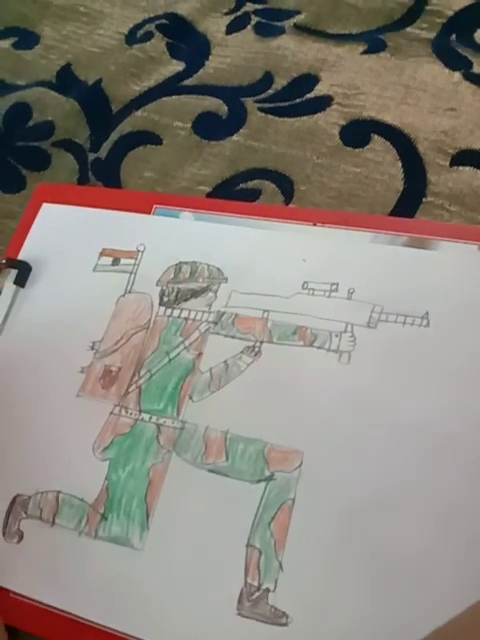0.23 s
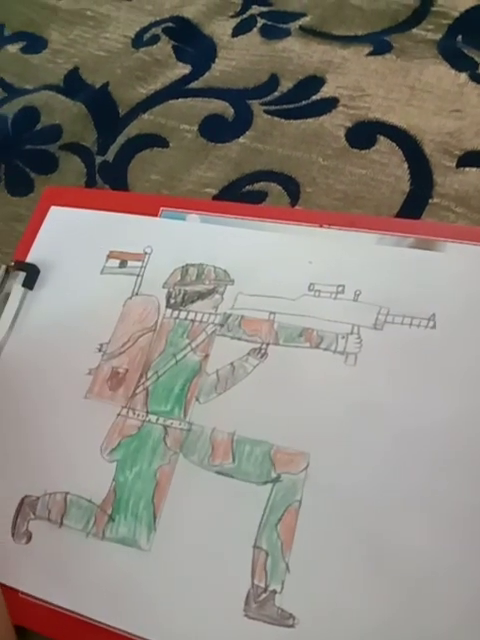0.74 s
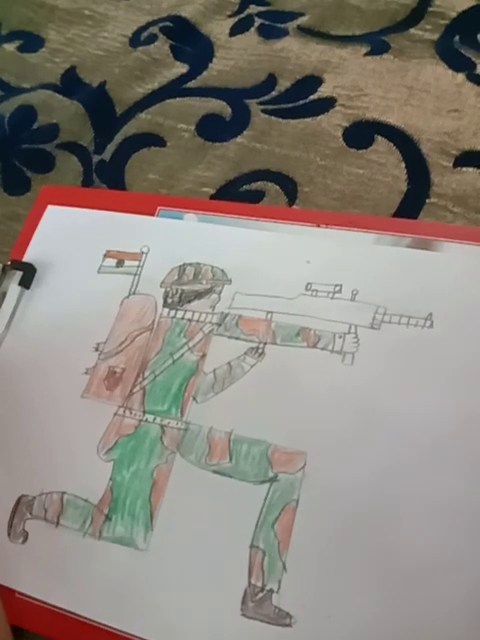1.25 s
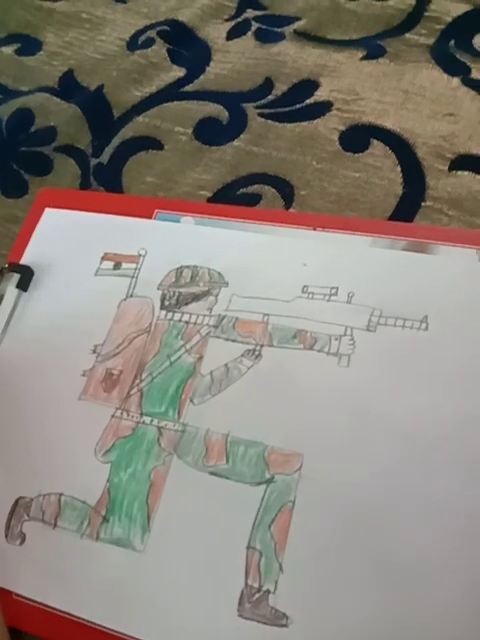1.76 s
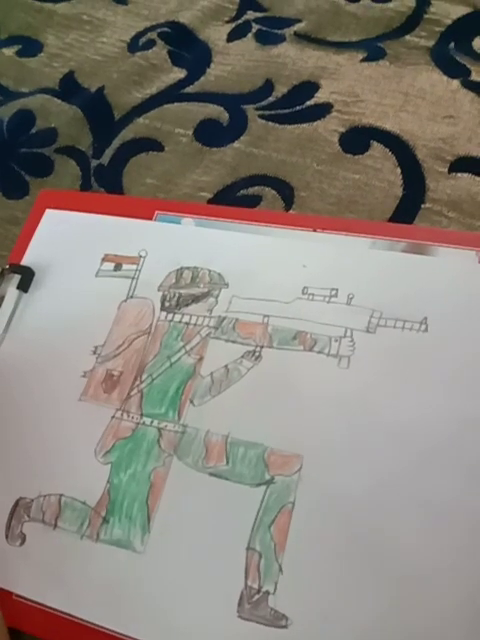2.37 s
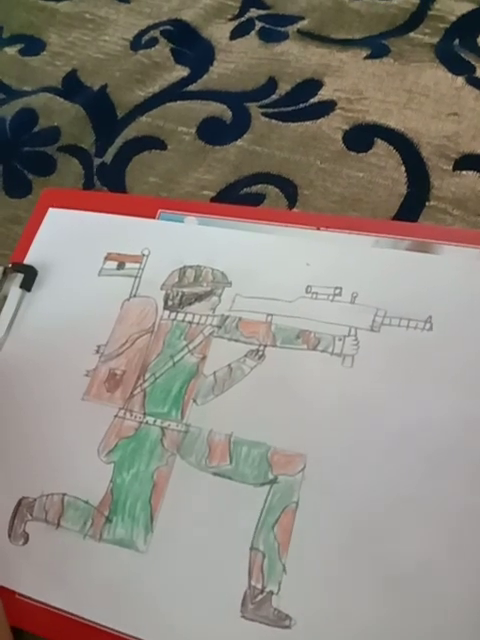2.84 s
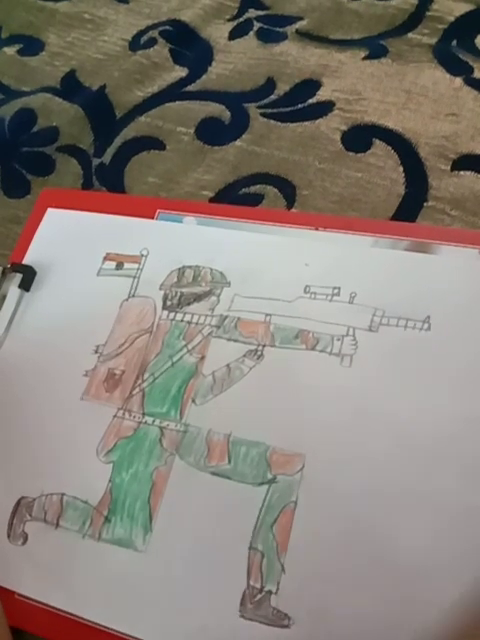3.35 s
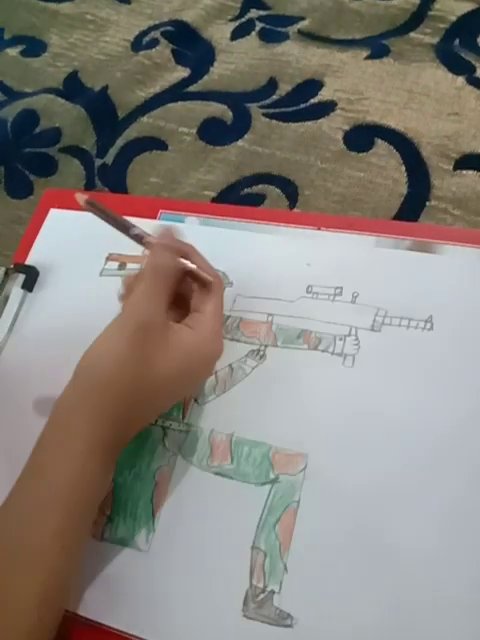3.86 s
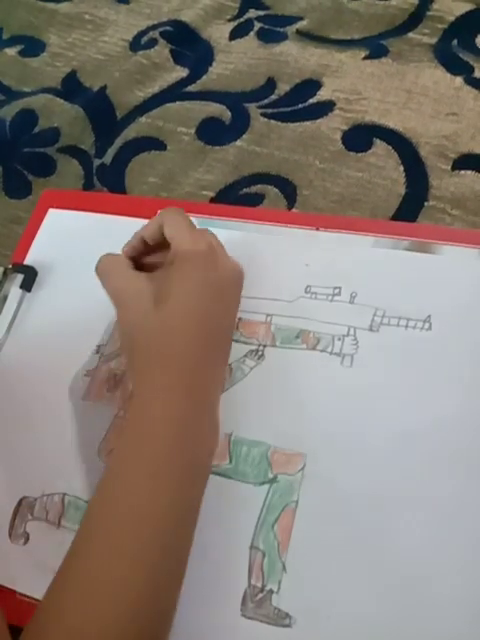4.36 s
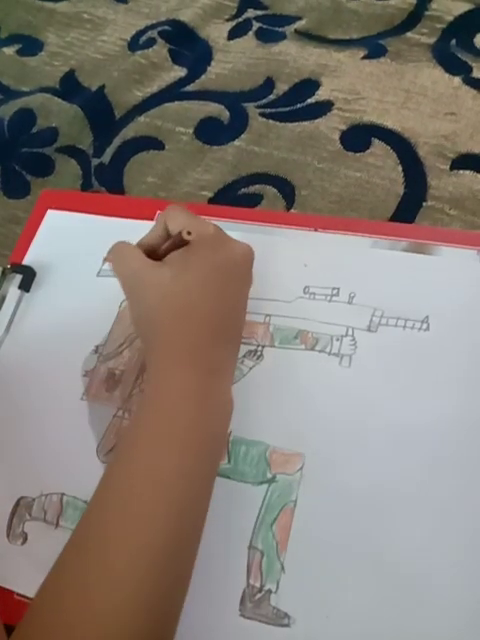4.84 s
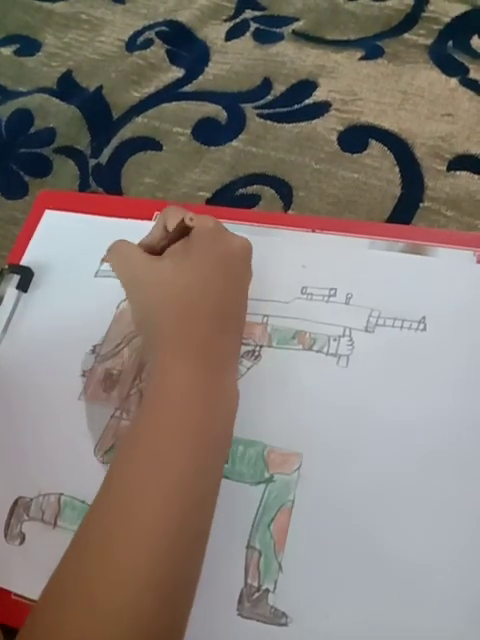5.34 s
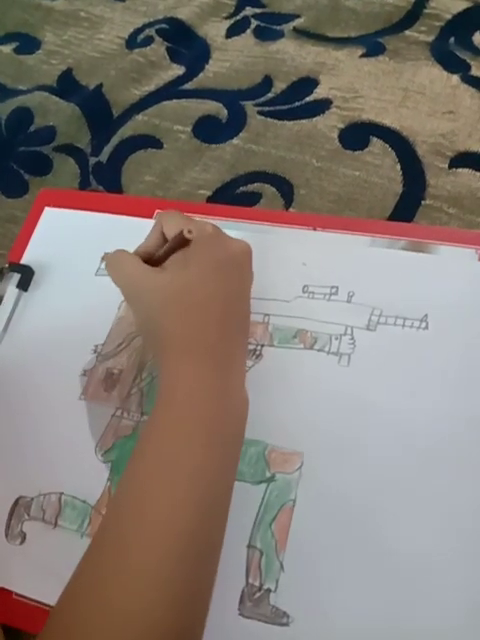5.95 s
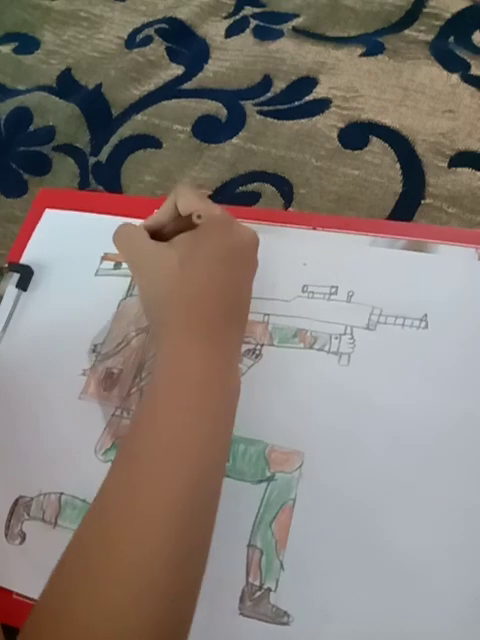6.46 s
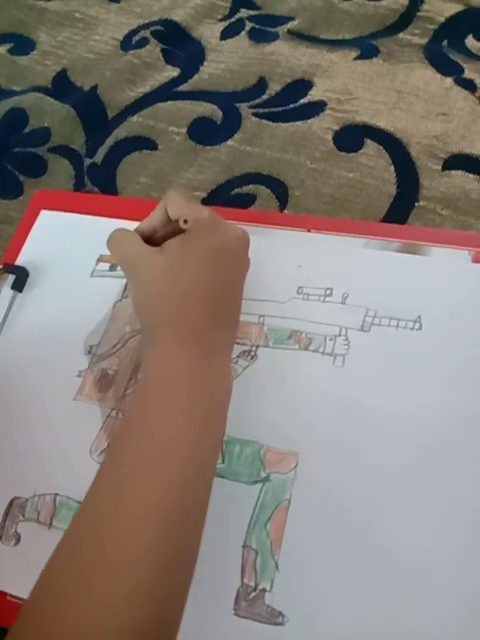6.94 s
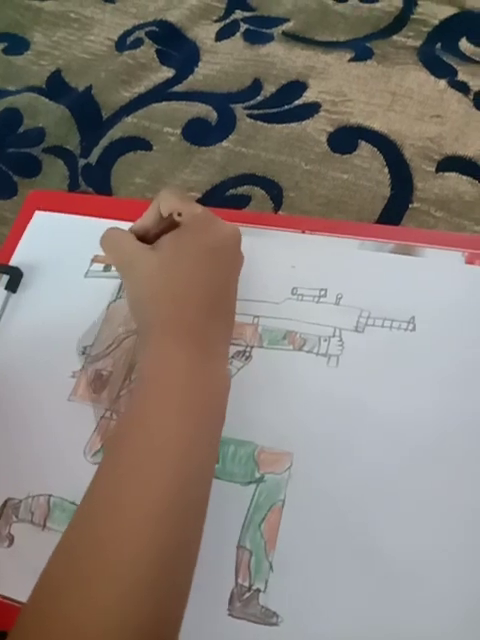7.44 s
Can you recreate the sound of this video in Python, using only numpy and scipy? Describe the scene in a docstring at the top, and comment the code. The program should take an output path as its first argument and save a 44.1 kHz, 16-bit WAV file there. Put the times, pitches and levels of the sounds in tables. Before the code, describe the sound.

Close in a small quiet room, wooden pencils clack and scuff against each other in a box, irregularly at first, then in a hard, loud cluster around three seconds. An arm slides softly over cloth, a hand lands on a drawing board with a dull knock, and a pencil begins fast, dry shading strokes on paper, gradually growing fainter.

```python
"""Pencils rattle and clack in a box as one is picked out; an arm slides in, a hand lands, and shading begins.
Clacks, ticks and knocks are short forces that ring resonances of box, pencil and drawing board.
Scuffs and strokes are friction: random catches and noise, coloured and swept by the speed of each gesture.
Soft rubbing, wavering air and faint far-off tones fill a small quiet room, heard through one close microphone."""
import sys
import numpy as np
from scipy import signal
from scipy.fft import rfft, irfft, next_fast_len
from scipy.io import wavfile
from scipy.ndimage import uniform_filter1d

SR = 44100
rng = np.random.default_rng(int(sys.argv[2]) if len(sys.argv) > 2 else 0)


def unload_wav(signal):
    """Save mono or channel-first audio to the path in sys.argv[1] as 16-bit WAV at rate SR, clipped to [-1, 1]."""
    wavfile.write(
        sys.argv[1],
        SR,
        np.round(np.clip(np.atleast_2d(signal).T, -1, 1) * 32767).astype(np.int16),
    )


N = 339570
TIME = np.arange(N) / SR

# All table levels are relative. Spectra are in dB per Hz.
# Still room air, also the colour of the side noise. Each row: frequency in Hz, level in dB per Hz.
AIR_SPECTRUM = [(25, 1), (55, -5), (95, 9.5), (150, 7), (230, -1.5), (600, -7.5), (1000, -10.5),
                (1500, -13), (3000, -14.5), (5500, -21.5), (8500, -30.5), (15000, -29)]
# Faint far-off tones. Each row: start in seconds, end in seconds, frequency in Hz, width in Hz, level in dB.
FAR_TONES = [(.708, 0.788, 2960, 25, -74.5), (1.06, 1.615, 85.6, 3.7, -65), (1.167, 1.31, 2130, 140, -77),
             (1.26, 1.5, 525, 39, -73), (1.49, 1.892, 3660, 440, -75), (4.004, 4.177, 1085, 115, -76.5),
             (4.498, 4.75, 1177, 230, -78), (4.92, 5.05, 3640, 590, -69), (6.144, 6.311, 1105, 25, -70.5)]
# Arm sliding in over cloth. Each row: start in seconds, end in seconds, level in dB.
ARM_SLIDES = [(3.33, 3.88, -63)]
# Hand shifting over the paper. Each row: start in seconds, end in seconds, level in dB.
HAND_SLIDES = [(3.6, 3.9, -76), (4.06, 4.31, -63.5), (4.25, 4.54, -68)]
# Arm on cloth. Each row: frequency in Hz, level in dB per Hz.
CLOTH_SPECTRUM = [(300, -12), (800, -5), (1500, -4), (2800, -0.5), (5000, -7.5), (7000, -15.5), (9500, -20),
                  (15000, -40)]
# Hand on paper. Each row: frequency in Hz, level in dB per Hz.
SKIN_SPECTRUM = [(800, -14), (2200, -8), (3100, 5), (4300, -0.5), (5800, -0.5), (7500, 0), (9500, 1),
                 (11400, -1.5), (13500, -17), (15500, -3.5)]
# Pencils sliding on each other in the box. Each row: start in seconds, speeding up in seconds,
# slowing down in seconds, rattle level in dB, lacquer hiss level in dB.
SCUFFS = [(.118, 0.0063, 0.044, -53, -59), (.345, 0.05, 0.02, -62, -67.5), (.483, 0.032, 0.054, -63, -67.5),
          (.78, 0.04, 0.33, -86, -71), (.92, 0.02, 0.046, -55.5, -70), (1.99, 0.023, 0.065, -65.5, -67),
          (2.065, 0.056, 0.035, -61.5, -60.5), (2.16, .051, .11, -65, -68.5),
          (2.497, 0.017, 0.19, -62, -68), (2.695, 0.041, 0.06, -56.5, -72), (2.77, 0.2, 0.066, -57, -77),
          (3.085, 0.026, 0.049, -51.5, -65), (3.15, 0.053, 0.022, -46, -59)]
# Rattle of a scuff. Each row: frequency in Hz, level in dB per Hz.
RATTLE_SPECTRUM = [(200, -31.5), (600, -16), (900, -5), (1300, -2.5), (1900, 1), (2900, -8.5), (4200, -14),
                   (8000, -35)]
# Lacquer hiss of a scuff. Each row: frequency in Hz, level in dB per Hz.
LACQUER_SPECTRUM = [(1500, -25), (3200, -1.5), (4400, -9), (5500, 2), (7200, -5.5), (8300, -12),
                    (11000, -11.5), (15000, -26)]
# Pencils clacking in the box. Each row: time in seconds, level in dB, clatter relative to the hit in dB.
CLACKS = [(0.0187, -35.5, 11), (0.0971, -37, 4.5), (.123, -60, -1), (.803, -44, 9), (0.229, -38.5, 3),
          (0.345, -38, 11), (.438, -41, 1), (.936, -36.5, 3), (.955, -40.5, 17), (0.961, -37, 3),
          (0.9893, -37.5, 10.5), (1.679, -44, 4), (1.786, -45.5, 9.5), (2.228, -27.5, -7.5),
          (2.24, -33, -11), (2.51, -40.5, 3), (2.7384, -35.5, 5), (2.887, -39, 12), (2.92, -30.5, -1),
          (2.9396, -13.5, -2), (2.9425, -19.5, -2.5), (3.12, -18, 1), (3.1277, -20.5, 3),
          (3.1311, -20.5, 3.5), (3.167, -16, -12), (3.2106, -8.5, -5.5), (3.214, -8, 3), (3.221, -20, -2.5),
          (3.2452, -5, -12.5)]
# Pencils and box walls. Each row: frequency in Hz, width in Hz, level in dB.
BOX_MODES = [(872, 90, 4.5), (1120, 120, 7), (1380, 66, 1), (1530, 36, -4), (1880, 530, 10.5),
             (2083, 100, -29), (2460, 330, -0.5), (3020, 200, -4), (3540, 130, -10), (5106, 230, -2),
             (6615, 230, -23.5), (11000, 11000, -20)]
# Box floor, reached mainly by hard hits. Each row: frequency in Hz, width in Hz, level in dB.
BOX_FLOOR_MODES = [(169, 13, 0), (211, 46, -5), (318, 93, -2), (390, 110, -1.5), (496, 100, -7)]
# One pencil ticking against another. Each row: time in seconds, level in dB.
TICKS = [(1.9888, -26.5), (2.011, -50), (2.579, -58), (3.935, -56)]
# A single pencil. Each row: frequency in Hz, width in Hz, level in dB.
PENCIL_MODES = [(1224, 34, -3.5), (1970, 84, 2), (2680, 130, -3), (3100, 51, 1), (4000, 227, 2.5),
                (5150, 540, -6), (5600, 400, 8.5), (6620, 230, 3.5), (8000, 500, -38), (9960, 170, -47)]
# Soft knocks of hand, box and pencil tip on the board. Each row: time in seconds, level in dB,
# contact time in seconds.
KNOCKS = [(1.788, -41, 0.0036), (2.024, -51, 0.0025), (3.246, -48, 0.01), (3.7763, -25, 0.0025),
          (4.094, -46.5, 0.0049), (4.305, -48, 0.0042), (4.704, -37.5, .0014), (6.583, -36, 0.0012)]
# Drawing board, lowest mode first. Each row: frequency in Hz, width in Hz, level in dB.
BOARD_MODES = [(150.9, 26, 9.5), (242.4, 110, 0.5), (471, 225, 6), (625, 150, -6), (1215, 360, -15.5)]
# Pencil strokes. Each row: start in seconds, length in seconds, level in dB.
STROKES = [(4.765, 0.12, -60), (4.899, 0.061, -55.5), (5.008, 0.11, -63), (5.135, 0.079, -58.5),
           (5.241, 0.11, -60.5), (5.371, .074, -60.5), (5.485, 0.11, -61.5), (5.641, 0.049, -59.5),
           (5.734, 0.08, -65), (5.844, 0.054, -73), (5.949, 0.068, -68.5), (6.049, 0.053, -62.5),
           (6.145, 0.066, -65), (6.238, 0.072, -64), (6.291, 0.12, -64.5), (6.657, 0.063, -74),
           (6.753, 0.073, -69), (6.873, 0.057, -80), (7.005, 0.08, -83.5), (7.103, 0.088, -76),
           (7.219, 0.065, -79), (7.348, 0.067, -77), (7.488, 0.075, -77), (7.556, 0.071, -74.5),
           (7.628, 0.061, -81)]
# Grips: firm, easier, lifting off, light. Each row: start in seconds, share of a stroke spent speeding up,
# then levels relative to the stroke in dB: fine sizzle, lead squeak, pencil shaft, board.
GRIPS = [(4.7, .32, 4, -5, 1.5, 4.5), (5.71, .36, -8, -14, -2, 3.5), (6.29, .66, 0, 1, -19, -10.5),
         (6.6, 0.98, 7, -13, 12.5, -1.5)]
# Hiss of the sheet. Each row: frequency in Hz, width in Hz, level in dB.
PAPER_MODES = [(3120, 1150, -1), (3700, 580, 1.5), (4500, 380, -0.5), (5580, 480, 4.5), (7500, 1500, 3),
               (8730, 1100, -6), (9700, 1800, 2), (10650, 750, -10.5)]
# Fine sizzle. Each row: frequency in Hz, width in Hz, level in dB.
SIZZLE_MODES = [(15100, 1100, 0)]
# Squeak of the lead. Each row: frequency in Hz, width in Hz, level in dB.
LEAD_MODES = [(7300, 230, 0)]
# Pencil shaft under a stroke. Each row: frequency in Hz, level in dB per Hz.
SHAFT_SPECTRUM = [(900, -35), (1150, 3), (1450, -1.5), (1800, 3), (2350, -4.5), (2800, 1.5), (3700, -13),
                  (5000, -8), (9000, -33)]
# Board under a stroke. Each row: frequency in Hz, level in dB per Hz.
BOARD_SPECTRUM = [(70, -26), (140, 11.5), (200, -10), (300, -11), (460, 0.5), (600, -4), (800, -13),
                  (960, -17.5), (2000, -30.5)]
# Microphone port. Each row: frequency in Hz, width in Hz, level in dB.
PORT_MODES = [(1258, 47.6, 10), (7200, 320, -2), (15170, 2700, -3)]

AIR_DB, HISS_DB = -69.5, -86
SIDE_NOISE_ABOVE_HZ = 650  # less bass in the side noise
SLIDE_ATTACK_S, SLIDE_RELEASE_S = 0.094, 0.097
CLACK_BRIGHT_HZ, CLACK_FULL_DB, CLACK_DB_PER_OCTAVE = 6800, -14, 9.5  # hits below the full level are duller
USUAL_STROKE_S, LONG_STROKE_LAG = 0.0743, 0.577  # longer strokes peak relatively later, by this power
JAB_DB = 2  # extra shake of pencil and board per halving of stroke length
NUDGE_DB, NUDGE_CONTACT_S = 12, 0.0049  # the braking hand nudges the board; dB over the stroke's board level
NUDGE_AT = 0.503  # share of the slowing down passed by then
ROOM_T60_S, CUTOFF_HZ = 0.24, 15700


def from_db(db):
    """Decibels to gain."""
    return np.exp(np.asarray(db) * (np.log(10) / 20))


def rms_one(x):
    """Scale to rms 1."""
    return x / np.sqrt(np.mean(x ** 2) + 1e-20)


def highpass(x, order, cut_hz):
    """Butterworth bass cut."""
    return signal.sosfilt(signal.butter(order, cut_hz, "high", fs=SR, output="sos"), x)


def lowpass(x, cut_hz):
    """First-order treble cut."""
    return signal.sosfilt(signal.butter(1, cut_hz, fs=SR, output="sos"), x)


def coloured(x, spectrum):
    """Shape a steady sound by a spectrum, interpolated over log frequency; rms 1."""
    hz, db = np.transpose(spectrum)
    size = next_fast_len(N)
    bins_hz = np.arange(size // 2 + 1) * SR / size + 1  # +1 avoids log(0)
    gain = from_db(np.interp(np.log(bins_hz), np.log(hz), db))
    return rms_one(irfft(rfft(x, size) * gain, size)[:N])


def resonate(x, modes):
    """Parallel two-pole resonances."""
    out = 0
    for hz, width_hz, db in modes:
        r = np.exp(-np.pi * width_hz / SR)
        poles = [1, -2 * r * np.cos(2 * np.pi * hz / SR), r * r]
        ringing = signal.lfilter([1, 0, -1], poles, x + 1e-18)
        out = out + from_db(db) * (1 - r * r) / 2 * ringing
    return out


def strike(force, modes):
    """A body rings under a force; a unit click peaks at 1."""
    response = resonate(signal.unit_impulse(SR // 2), modes)
    return signal.oaconvolve(force, response / np.abs(response).max())[:N]


def bend(force, slowness, order):
    """Bending waves in wood disperse: an all-pass chain delays the lows behind the treble."""
    return signal.sosfilt([[-slowness, 1, 0, 1, -slowness, 0]] * order, force + 1e-18)


def burst(decay_s):
    """A dying spray of tiny contacts; unit energy."""
    age_s = TIME[:SR // 20]
    spray = rng.standard_normal(len(age_s)) * np.exp(-age_s / decay_s)
    return spray / np.linalg.norm(spray)


def add(track, start_s, piece):
    """Mix a piece in at a time."""
    start = max(round(start_s * SR), 0)
    track[start:start + len(piece)] += piece[:N - start]


def friction(per_s, spread_db):
    """Countless small catches and slips of uneven size; rms 1."""
    caught = rng.random(N) < per_s / SR
    sign = rng.choice([-1, 1], N)
    size = from_db(spread_db * np.minimum(rng.exponential(1, N), 4))
    return rms_one(caught * sign * size)


def drift(per_s):
    """Smooth chance; rms 1."""
    knots = rng.standard_normal(8000)
    return rms_one(np.interp(TIME * per_s, np.arange(len(knots)), knots))


def patchy(x, depth_db, size=512):
    """Let patches about 60 ms long and 400 Hz wide swell and fade by chance; rms 1."""
    frames = signal.stft(x, nperseg=size)[2]
    across_hz = uniform_filter1d(rng.standard_normal(frames.shape), size=5, axis=0)
    patches = uniform_filter1d(across_hz, size=10, axis=1)
    swelling = frames * from_db(depth_db * rms_one(patches))
    return rms_one(signal.istft(swelling, nperseg=size)[1][:N])


def rustle(x, modes, wander_db):
    """Steep resonances whose strengths wander as the contact point moves; rms 1."""
    out = 0
    for hz, width_hz, db in modes:
        band = [(hz, width_hz * np.sqrt(2), 0)]  # widened, as two passes narrow it
        out = out + from_db(db + wander_db * drift(25)) * resonate(resonate(x, band), band)
    return rms_one(out)


def slides(rows):
    """Gain of steady slides: each gets under way, holds and comes to rest."""
    gain = np.zeros(N)
    for start_s, end_s, db in rows:
        attack = np.clip((TIME - start_s) / SLIDE_ATTACK_S, 0, 1)
        release = np.clip((end_s - TIME) / SLIDE_RELEASE_S, 0, 1)
        gain += from_db(db) * attack * release
    return gain


def gesture(start_s, rise_s, fall_s):
    """One sweep of the hand, as samples and loudness; pressure eases off as it slows toward the turn."""
    span = slice(max(int(start_s * SR), 0), int((start_s + rise_s + fall_s) * SR))
    age_s = TIME[span] - start_s
    speed = np.sin(np.pi / 2 * np.interp(age_s, [0, rise_s, rise_s + fall_s], [0, 1, 0]))
    pressure = np.where(age_s < rise_s, 1, speed)
    return span, speed * pressure


def sweeps(rows):
    """One gain curve per dB column of a table of gestures."""
    gains = np.zeros((len(rows[0]) - 3, N))
    for start_s, rise_s, fall_s, *levels_db in rows:
        span, loudness = gesture(start_s, rise_s, fall_s)
        gains[:, span] += from_db(levels_db)[:, None] * loudness
    return gains


def strokes():
    """Strokes under their grips: start, rise and fall in s; hiss, sizzle, squeak, shaft and board in dB."""
    rows = []
    for start_s, length_s, db in STROKES:
        grip = [row for row in GRIPS if row[0] <= start_s][-1]
        _, share, sizzle_db, squeak_db, shaft_db, board_db = grip
        stretch = length_s / USUAL_STROKE_S
        rise_s = length_s * np.clip(share * stretch ** LONG_STROKE_LAG, .1, .8)
        shaken_db = db - JAB_DB * np.log2(stretch)
        rows.append((start_s, rise_s, length_s - rise_s, db, db + sizzle_db, db + squeak_db,
                     shaken_db + shaft_db, shaken_db + board_db))
    return rows


def background():
    """Wavering room air, with faint, blurred tones swelling and fading far away."""
    out = from_db(AIR_DB) * patchy(coloured(rng.standard_normal(N), AIR_SPECTRUM), depth_db=2.44)
    for start_s, end_s, hz, width_hz, db in FAR_TONES:
        progress = np.interp(TIME, [start_s, end_s], [0, 1])
        swell = np.sqrt(np.abs(np.sin(np.pi * progress)))
        band = [(hz, width_hz, 0)]
        tone = rms_one(resonate(resonate(rng.standard_normal(N), band), band))
        out += from_db(db) * swell * tone
    return out


def rubbing(arm_db=-1.0, hand_db=0.0):
    """Arm and hand slide softly, their colour shifting with the patch of contact."""
    cloth = patchy(coloured(rng.standard_normal(N), CLOTH_SPECTRUM), depth_db=0.5)
    skin = patchy(coloured(rng.standard_normal(N), SKIN_SPECTRUM), depth_db=4.4)
    return from_db(arm_db) * slides(ARM_SLIDES) * cloth + from_db(hand_db) * slides(HAND_SLIDES) * skin


def scuffs(rattle_db=-0.5, hiss_db=-6.5, patchy_db=5.0):
    """Sliding pencils judder on their edges while their lacquer hisses."""
    rattle_gain, hiss_gain = sweeps(SCUFFS)
    judder = patchy(coloured(friction(per_s=990, spread_db=-2.0), RATTLE_SPECTRUM), patchy_db)
    hiss = patchy(coloured(friction(per_s=6600, spread_db=4.5), LACQUER_SPECTRUM), patchy_db)
    return from_db(rattle_db) * rattle_gain * judder + from_db(hiss_db) * hiss_gain * hiss


def clacks(crack_s=0.0021, crack_db=-4.5, clatter_s=0.0096, clack_db=-0.5, floor_db=-18.5, hard_hit_db=-31.0):
    """Each hit cracks and briefly jostles the neighbouring pencils; hard ones also thump the box floor."""
    force, heavy = np.zeros(N), np.zeros(N)
    for time_s, db, clatter_db in CLACKS:
        octaves_duller = min(db - CLACK_FULL_DB, 0) / CLACK_DB_PER_OCTAVE  # negative
        hit = signal.unit_impulse(SR // 20)
        hit = hit + from_db(crack_db) * burst(crack_s) + from_db(clatter_db) * burst(clatter_s)
        hit = from_db(db + clack_db) * lowpass(hit, CLACK_BRIGHT_HZ * 2 ** octaves_duller)
        add(force, time_s, hit)
        add(heavy, time_s, hit / (1 + from_db(hard_hit_db - db)))  # soft threshold
    box = strike(bend(force, slowness=0.31, order=4), BOX_MODES)
    box_floor = from_db(floor_db) * strike(heavy, BOX_FLOOR_MODES)
    return highpass(box + box_floor, 4, 130)  # a small box radiates little bass


def ticks(buzz_db=6.5, buzz_s=0.0016):
    """Hard contacts buzz for an instant and ring one pencil's bending modes."""
    force = np.zeros(N)
    for time_s, db in TICKS:
        contact = signal.unit_impulse(SR // 20) + from_db(buzz_db) * burst(buzz_s)
        add(force, time_s, from_db(db) * contact)
    return strike(bend(force, slowness=0.53, order=18), PENCIL_MODES)


def knocks(knock_db=4.5):
    """A soft contact is a smooth push: the longer it lasts, the duller the board answers."""
    force = np.zeros(N)
    nudges = []
    for start_s, rise_s, fall_s, *_, board_db in strokes():
        nudges.append((start_s + rise_s + NUDGE_AT * fall_s, board_db + NUDGE_DB, NUDGE_CONTACT_S))
    for time_s, db, contact_s in list(KNOCKS) + nudges:
        push = np.sin(np.pi * np.minimum(TIME[:SR // 20] / contact_s, 1)) ** 2
        add(force, time_s, from_db(db + knock_db) * push / np.sqrt(push.sum() * 10))
    return highpass(strike(force, BOARD_MODES), 2, 70)


def boom(boom_db=-3.0):
    """The strokes keep the board's lowest mode humming; it rings on across each turn."""
    push, lowest = rng.standard_normal(N), BOARD_MODES[:1]
    board_gain = sweeps(strokes())[-1]
    return from_db(boom_db) * resonate(board_gain * push, lowest) / np.std(resonate(push, lowest))


def shading(hiss_db=1.5, sizzle_db=-10.0, squeak_db=-6.0, shaft_db=-6.0, board_db=4.5, tooth_db=1.0):
    """The paper's grain catches the lead and shakes sheet, lead, pencil and board."""
    hiss_gain, sizzle_gain, squeak_gain, shaft_gain, board_gain = sweeps(strokes())
    grain = friction(per_s=9800, spread_db=1.0)
    hiss = patchy(rustle(grain, PAPER_MODES, wander_db=1.1), depth_db=1.4)
    sizzle = rustle(grain, SIZZLE_MODES, wander_db=3.0)
    squeak = rustle(rng.standard_normal(N), LEAD_MODES, wander_db=-7.0)
    shaft = patchy(coloured(friction(per_s=5000, spread_db=0.0), SHAFT_SPECTRUM), depth_db=4.5)
    board = coloured(friction(per_s=900, spread_db=1.5), BOARD_SPECTRUM)  # only the bigger catches
    out = from_db(hiss_db) * hiss_gain * hiss
    out += from_db(sizzle_db) * sizzle_gain * sizzle
    out += from_db(squeak_db) * squeak_gain * squeak
    out += from_db(shaft_db) * shaft_gain * shaft
    out += from_db(board_db) * board_gain * board
    return out * from_db(tooth_db * drift(250))  # coarser fibres make the scratch uneven


def room(x, wall_cut_hz=6000, build_s=0.014):
    """Diffuse reflections build up quickly and die away, dulled by the furnishings."""
    age_s = TIME[:SR // 2]
    decay = from_db(-60 * age_s / ROOM_T60_S)
    tail = rng.standard_normal(len(age_s)) * decay * (1 - np.exp(-age_s / build_s))
    return signal.oaconvolve(x, lowpass(tail / np.linalg.norm(tail), wall_cut_hz))[:N]


def scene(box_room_db=-12.5, tick_room_db=-15.0, board_room_db=-14.5, room_width_db=-25.0, side_noise_db=-3.0):
    """The box lies farther off than the board, so it sends more to the room; room and faint noise have width."""
    box = clacks() + scuffs()
    tick = ticks()
    board = shading() + boom() + knocks()
    sent = from_db(box_room_db) * box + from_db(tick_room_db) * tick + from_db(board_room_db) * board
    mid = box + tick + board + room(sent) + rubbing() + background()
    side_noise = highpass(coloured(rng.standard_normal(N), AIR_SPECTRUM), 1, SIDE_NOISE_ABOVE_HZ)
    side = from_db(room_width_db) * room(sent) + from_db(AIR_DB + side_noise_db) * side_noise
    electronic_hiss = from_db(HISS_DB) * rng.standard_normal((2, N))
    return np.stack([mid + side, mid - side]) + electronic_hiss


def record(dry):
    """The microphone port rings a little; deep bass and the top are cut."""
    voiced = highpass(dry + resonate(dry, PORT_MODES), 2, 60)
    top_cut = signal.ellip(10, .3, 70, CUTOFF_HZ, fs=SR, output="sos")
    return signal.sosfilt(top_cut, voiced)


dry = scene()
out = record(dry)
unload_wav(out)
```